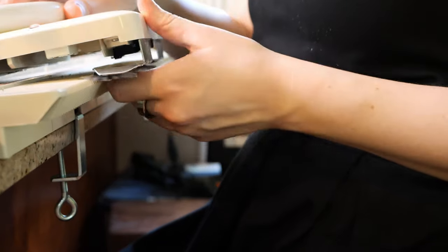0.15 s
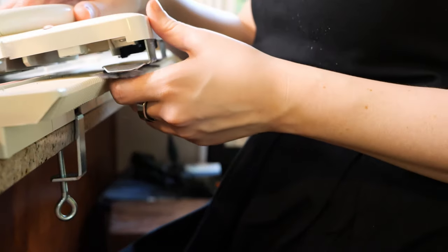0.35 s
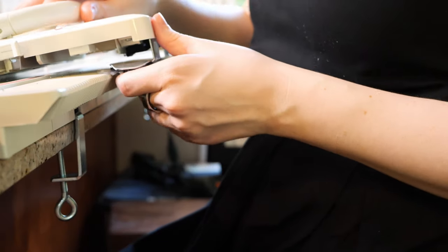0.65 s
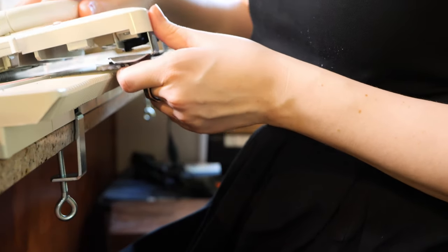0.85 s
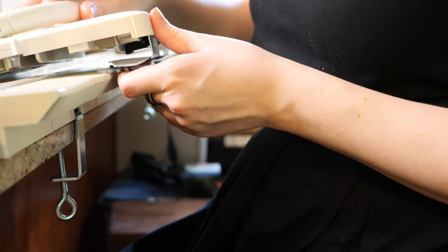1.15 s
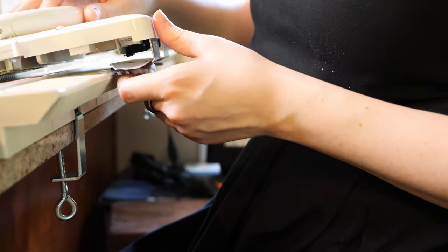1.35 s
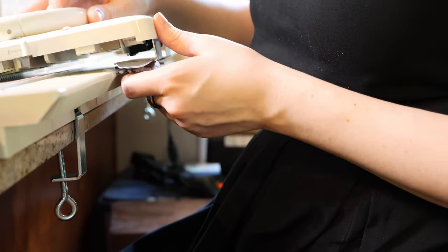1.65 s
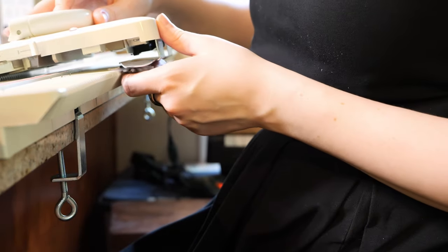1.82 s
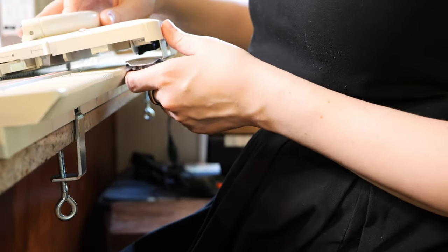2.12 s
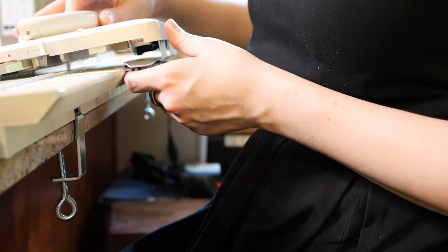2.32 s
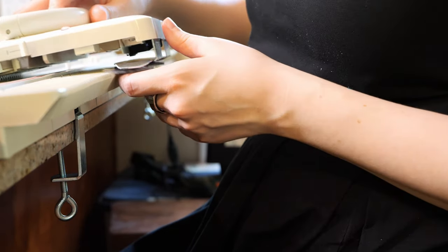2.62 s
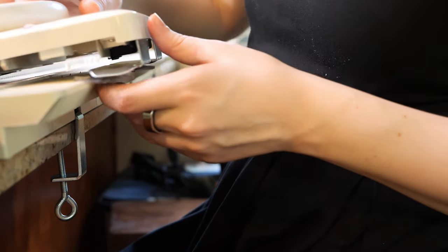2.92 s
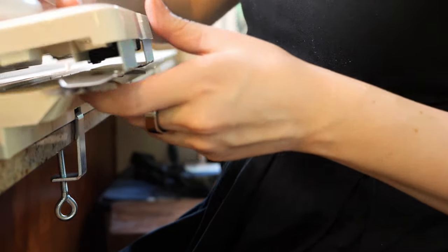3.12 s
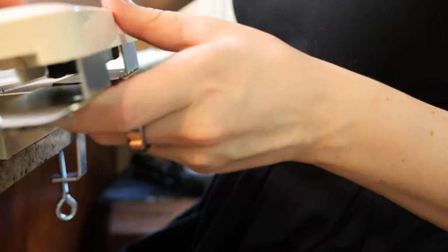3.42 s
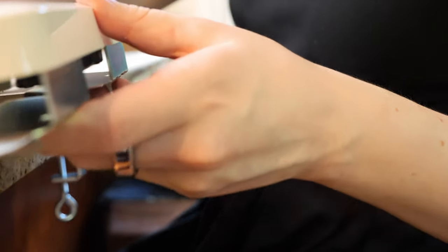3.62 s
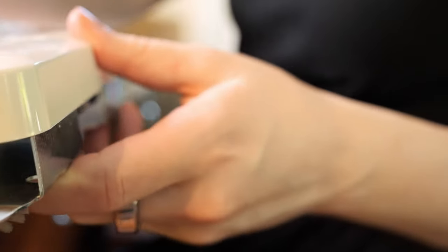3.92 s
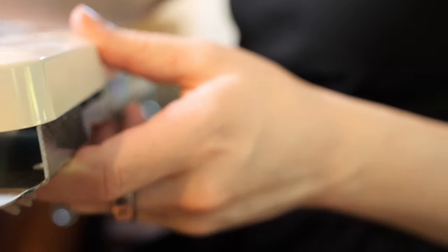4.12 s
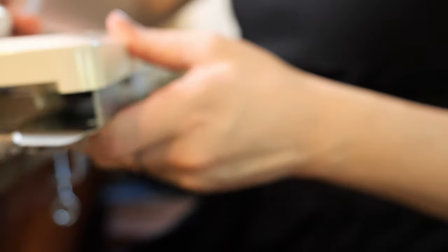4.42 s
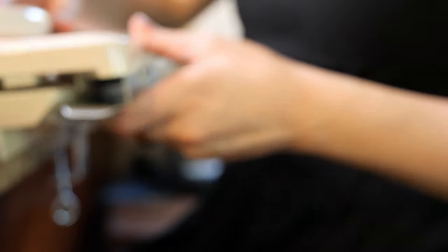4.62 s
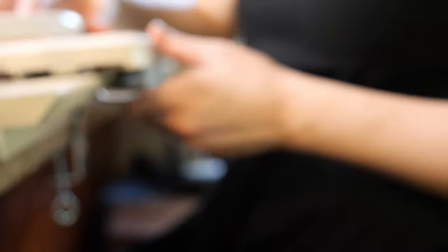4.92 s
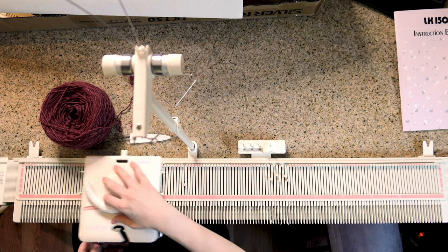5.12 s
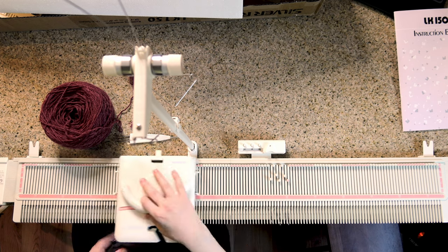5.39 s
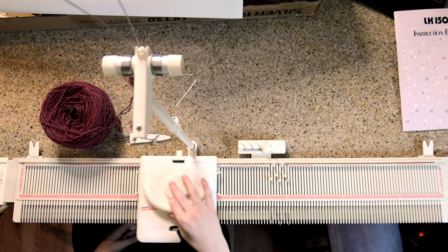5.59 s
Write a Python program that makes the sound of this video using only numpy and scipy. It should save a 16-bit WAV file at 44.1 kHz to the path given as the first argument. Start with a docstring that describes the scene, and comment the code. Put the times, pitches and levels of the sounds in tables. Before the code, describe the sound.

A knitting machine carriage, heard close up in a small room with quiet low room noise. At 0.14 s it knocks onto the bed with a sharp hollow plastic clack, then rasps slowly over needles until about 0.7 s with separate snaps. A near-quiet gap holds only faint taps, with small knocks at 1.3 and 1.46 s. A second short grating nudge runs 1.55-2.2 s. From 2.37 s a longer push begins, clicks crowding into a fast ratcheting scrape, brightest near 3.0 s and loudest around 3.2 s, easing by 3.7 s. At 3.9 s the carriage hits its stop with the loudest hollow clunk, rattling and ringing briefly. After a lull, small latch ticks gather from 4.28 to 4.6 s, with a firm knock at 4.81 s. Light gliding hiss and faint runner squeaks continue, then glassy clicks from 5.45 s and a double knock near 5.68 s.

```python
"""A knitting machine carriage, close by in a small room: seated on its needle bed, nudged twice, pushed along, slid back.
Needle butts snap through the cams and ring the plastic shell: short bursts of impacts through resonances.
The runners rasp on the rail and shake the table: dense random impacts, pulsing once per needle.
The carriage knocks against its stops with hollow rings, small steel latches tick, and runners sing in narrow bands.
Behind it lie quiet room noise and a short diffuse tail."""
import sys
import numpy as np
from scipy import signal
from scipy.fft import rfft, irfft, next_fast_len
from scipy.io import wavfile
from scipy.ndimage import uniform_filter1d

SR = 44100
rng = np.random.default_rng(int(sys.argv[2]) if len(sys.argv) > 2 else 0)


def dump(signal):
    """Clip the signal to [-1, 1] and save it as 16-bit WAV at the path in sys.argv[1]."""
    limited = np.clip(np.atleast_2d(signal).T, -1, 1)
    pcm = np.round(limited * 32767).astype(np.int16)
    wavfile.write(sys.argv[1], SR, pcm)


N = 253556
T = np.arange(N) / SR
HIT_T = T[:3072]  # time axis of one contact, s
LEAD = 176  # samples of scrape before each blow


def undb(db):
    """Decibels to gain."""
    return 10 ** (np.asarray(db) / 20)


def unit(x):
    """Scale to rms 1."""
    return x / np.sqrt(np.mean(x ** 2))


def crest(x):
    """Scale so that the loudest 3 ms have rms 1."""
    return x / np.sqrt(uniform_filter1d(x ** 2, size=132).max())


def through(x, response):
    """Pass a sound through an impulse response."""
    return signal.fftconvolve(x, response)[:len(x)]


def on_log(hz, points):
    """Read (f/Hz, value) points on a log-frequency axis."""
    f, value = np.transpose(points)
    return np.interp(np.log(np.maximum(hz, 1)), np.log(f), value)


def colour(points, size=4096):
    """Causal minimum-phase impulse response with the given spectrum, built from its folded cepstrum."""
    hz = np.arange(size // 2 + 1) * SR / size
    cepstrum = irfft(np.log(undb(on_log(hz, points))))
    cepstrum[1:size // 2] *= 2
    cepstrum[size // 2 + 1:] = 0
    return irfft(np.exp(rfft(cepstrum)))


def band(x, hz, width_hz):
    """One resonance, gain 1 at its centre."""
    b, a = signal.iirpeak(min(hz, SR / 2 - 1000), hz / width_hz, fs=SR)
    return signal.lfilter(b, a, x)


def fade(t, t60):
    """Exponential decay, 60 dB down at t60."""
    return np.exp(-np.log(1000) * t / t60)


def walk(rate):
    """Random drift of rms 1, taking a new value `rate` times a second."""
    hold = max(int(SR / rate), 2)
    steps = np.repeat(rng.standard_normal(N // hold + 1), hold)
    return unit(uniform_filter1d(steps, hold)[:N])


def read(curve):
    """A two-column curve over t/s at every sample, its end values held."""
    return np.interp(T, *np.transpose(curve))


def along(curve):
    """A (t/s, level/dB) curve at every sample, practically silent outside its span."""
    return np.interp(T, *np.transpose(curve), left=-200, right=-200)


def gains(curve):
    """The dB columns of a curve as gains, silent outside its span."""
    s, *columns = np.transpose(curve)
    inside = (T >= s[0]) * (T <= s[-1])
    return [undb(np.interp(T, s, column)) * inside for column in columns]


def add(out, s, sound):
    """Mix a sound in at time s."""
    i = max(int(s * SR), 0)
    out[i:i + len(sound)] += sound[:len(out[i:])]


def split(x, centres):
    """Overlapping bands that add up to x again."""
    size = next_fast_len(len(x), True)
    spectrum, hz = rfft(x, size), np.arange(size // 2 + 1) * SR / size
    shares = np.eye(len(centres))
    return [irfft(spectrum * on_log(hz, np.c_[centres, share]), size)[:len(x)] for share in shares]


def waver(x, lo_hz, hi_hz, depth_db, rate):
    """As the contact spot moves, each band of the response swells and thins on its own; rms 1."""
    parts = split(x, np.geomspace(lo_hz, hi_hz, num=7))
    return unit(sum(part * undb(depth_db * walk(rate)) for part in parts))


def grains(rate, spread_db, size):
    """Tiny impacts at random moments, a few much larger than the rest; rms 1."""
    hit = rng.random(size) < rate / SR
    sign = rng.choice([-1, 1], size)
    strength = undb(spread_db * np.minimum(rng.exponential(size=size), 3))
    return unit(hit * sign * strength + 1e-9)


def contact(length_s, rattle, rate, rise_s):
    """A short scrape leads up to one blow, then a rattle of smaller impacts dies away."""
    t = HIT_T - LEAD / SR
    rise = np.minimum(t, 0) / rise_s
    decay = (np.maximum(t, 0) / max(length_s, 1e-3)) ** 1.16
    force = grains(rate, 1.1, size=len(HIT_T)) * np.exp(rise - decay)
    force *= rattle / np.sqrt(np.sum(force ** 2))  # rattle: root energy beside a blow of 1
    force[LEAD] += 1
    return force


# room noise around the microphone: f/Hz, level/dB
AIR_COLOUR = [(12, -26), (20, -3.5), (60, -2), (86, -8), (150, -4.5), (172, -4.5), (222, -9), (1030, -21.5),
              (1220, -30), (1610, -25.5), (4300, -34), (13900, -34.5), (16000, -36)]
AIR_DB = -61.5


def air(trim_db=-0.5):
    """Quiet steady room noise: white noise through one colour."""
    return undb(AIR_DB + trim_db) * unit(through(rng.standard_normal(N), colour(AIR_COLOUR)))


# decay of the small room: f/Hz, t60/s
ROOM_DECAY = [(150, 0.83), (600, 0.32), (2000, 0.37), (6000, 0.38), (14000, 0.15)]


def room(x, wet_db, gap_s=0.0047):
    """The sound plus the diffuse tail of a small room, decaying at its own pace in each band."""
    t = T[:SR // 2]
    centres, t60s = np.transpose(ROOM_DECAY)
    parts = split(rng.standard_normal(len(t)), centres)
    tail = sum(part * fade(t, t60) for part, t60 in zip(parts, t60s))
    tail *= np.clip(t / gap_s - 1, 0, 1)  # silent for one gap, risen after two
    return x + undb(wet_db) * through(x, tail / np.sqrt(np.sum(tail ** 2)))


# runners singing on the rail: t/s, length/s, f/Hz, level/dB
RUNNER_SQUEAKS = [(3.855, .031, 6800, -55), (4.651, 0.21, 1830, -53.5), (4.685, 0.0093, 6650, -42),
                  (4.689, 0.17, 6720, -65), (5.254, 0.12, 1110, -54), (5.27, 0.1, 1910, -51.5),
                  (5.273, 0.09, 7040, -68), (5.559, 0.13, 760, -53)]


def squeaks(width_hz=260):
    """A runner sings briefly: noise through a narrow band, filtered twice."""
    out = np.zeros(N)
    for s, length_s, hz, db in RUNNER_SQUEAKS:
        swell = signal.windows.tukey(int(length_s * SR))
        tone = band(band(rng.standard_normal(len(swell)), hz, width_hz), hz, width_hz)
        add(out, s, undb(db) * swell * unit(tone))
    return out


# modes of the plastic shell and needle bed: f/Hz, t60/s, level over the broad response/dB
SHELL_MODES = [(585.5, 0.069, -0.5), (683, 0.077, -9.5), (795, 0.12, -5.5), (864.6, 0.045, -3),
               (980, 0.078, -8), (1093, 0.042, -7.5), (1220, 0.089, -10), (1500, 0.061, -35),
               (1600, 0.068, -19), (1768, 0.082, -5), (1900, 0.13, -6.5), (2190, 0.086, -9),
               (2670, 0.21, -14), (3550, 0.29, 4), (3610, 0.46, -9), (5350, .04, -22)]


def shell(points):
    """Response of the carriage: a broad colour with its modes ringing on top."""
    broad = colour(points)
    width_per_t60 = np.log(1000) / np.pi  # a mode's bandwidth is this over its t60
    return broad + sum(undb(db) * band(broad, hz, width_per_t60 / t60) for hz, t60, db in SHELL_MODES)


# shell colour under latches and light gliding: f/Hz, level/dB
LIGHT_SHELL_COLOUR = [(150, -32), (300, -9.5), (560, -5.5), (850, -8), (1100, -2), (1500, -1.5), (1900, -2),
                      (2350, -2.5), (3000, -10.5), (3600, -19.5), (4500, -15), (10000, -86)]
# bright steel colour of latches and gliding runners: f/Hz, level/dB
BRIGHT_STEEL_COLOUR = [(1500, -45), (2800, 9), (3800, -4), (5500, 3.5), (8000, 1), (10500, 0.5), (13000, 3),
                       (16000, -5.5)]
# latches flicking: t/s, level before trims/dB, shell relative level before trim/dB, steel ring f/Hz, shell ring f/Hz
LATCH_FLICKS = [(2.4895, -42.5, 0, 6100, 1640), (4.2817, -51.5, 0, 5870, 2230),
                (4.3193, -52.5, 6, 5970, 2300), (4.3747, -50, 4, 5090, 2260), (4.396, -47, -4, 6240, 2830),
                (4.44, -47.5, -2, 5910, 2350), (4.494, -41.5, -11, 6550, 2210),
                (4.512, -39, -4, 6480, 2900), (4.5307, -41.5, -5, 6180, 2890),
                (4.5458, -34.5, -10, 6140, 2800), (4.5762, -35, -11, 8040, 2820),
                (4.736, -49.5, 11, 6240, 1840), (4.7669, -52, 14.5, 6230, 1640),
                (5.073, -46.5, 0, 6740, 1860), (5.452, -41.5, 8.5, 7950, 1190),
                (5.469, -43, -3, 12350, 1790), (5.478, -39, 6, 12700, 1640),
                (5.497, -39.5, 6.5, 12020, 1680), (5.538, -36, -1.5, 15100, 2250),
                (5.569, -42, -3, 13540, 1790), (5.5982, -35.5, 2.5, 12300, 2300),
                (5.625, -48, 11.5, 7280, 1590), (5.705, -32.5, 1, 14100, 1900)]
LATCH_RATTLE_S = 0.0056


def latches(tick_db=0, body_db=-1, ring_db=2, ring_width_hz=1200):
    """A latch scrapes open in a few milliseconds: a bright zip with some of the shell under it."""
    out, body, steel = np.zeros(N), shell(LIGHT_SHELL_COLOUR), colour(BRIGHT_STEEL_COLOUR)
    for s, db, shell_db, steel_hz, shell_hz in LATCH_FLICKS:
        tick = through(contact(LATCH_RATTLE_S, 7.2, 7000, 0.00033), steel)
        tick = tick + undb(ring_db) * band(tick, steel_hz, ring_width_hz)
        clack = through(contact(LATCH_RATTLE_S, 3.4, 3000, 0.0016), body)
        clack = clack + 3.3 * band(clack, shell_hz, 290)
        flick = undb(tick_db) * crest(tick) + undb(body_db + shell_db) * crest(clack)
        add(out, s - LEAD / SR, undb(db) * flick)
    return out


# carriage gliding lightly into its stop, then back again, one list each:
# t/s, rasp level before trim/dB, hiss level/dB
GLIDE_STROKES = [
    [(3.79, -61.5, -67), (3.9, -58, -54.5)],
    [(4.1, -65, -71.5), (4.458, -54.5, -62.5), (4.678, -48.5, -57), (4.9, -54.5, -60), (5.15, -53, -60),
     (5.536, -47.5, -56), (5.656, -47, -58), (5.75, -48, -46.5)],
]


def glide(rasp_db=-.5, hiss_db=0.0, catch_db=2.0, hum_db=-17):
    """Clear of the needles the runners rub finely, their colour shifting along the rail."""
    rasp, hiss = np.sum([gains(stroke) for stroke in GLIDE_STROKES], axis=0)
    catch = undb(catch_db * walk(90))
    rub = through(catch * grains(3000, 1.8, size=N), shell(LIGHT_SHELL_COLOUR))
    scrape = waver(rub, 770, 3700, 0.69, 13)
    steel_rub = through(catch * grains(14000, 2.0, size=N), colour(BRIGHT_STEEL_COLOUR))
    sizzle = waver(steel_rub, 3600, 18400, 2.2, 12)
    table = unit(band(band(rng.standard_normal(N), 113, 210), 140, 330))
    return rasp * (undb(rasp_db) * scrape + undb(hum_db) * table) + undb(hiss_db) * hiss * sizzle


# shell colour under a knock: f/Hz, level/dB
KNOCK_SHELL_COLOUR = [(88, -52), (170, -18), (340, -19), (450, -5.5), (600, -2.5), (800, -8), (1250, -5),
                      (1850, -3.5), (2300, -7), (2800, -11.5), (3300, -17), (4500, -36), (6000, -61),
                      (10000, -80)]
# steel edge and needle ticks: f/Hz, level/dB
STEEL_TICK_COLOUR = [(2000, -35), (4000, -2), (5300, -1), (7200, -1.5), (8500, -1.5), (10300, -3.5),
                     (13000, -1), (16000, -5)]
# carriage knocking on the bed: t/s, level before trims/dB, low ring f/Hz, high ring f/Hz,
# high ring relative level/dB, steel tick relative level before trim/dB, rattle length/s (shorter for the tick)
BED_KNOCKS = [(.1353, -22, 850, 1190, -6, -17.5, 0.0037), (0.1385, -29.5, 820, 1200, 11, -7, .0028),
              (0.778, -51.5, 860, 1110, 11, -18, 0.0069), (0.868, -49.5, 980, 1450, 3, -16, 0.0089),
              (0.877, -51, 990, 1930, 5, -24, .006), (1.031, -58, 1040, 1300, 6, -22, .004),
              (1.115, -56.5, 970, 1540, 9, -14, .005), (1.2975, -41.5, 850, 1770, -17, -15, 0.0073),
              (1.3034, -48, 940, 1550, -17, -30, 0.016), (1.46, -43, 850, 1180, -16, -18, 0.0072),
              (3.9018, -12, 635, 1315, 5, -15.5, 0.0092), (3.911, -18.5, 684, 1870, -2, -15, 0.0046),
              (3.92, -22, 865, 1280, -6, -5.5, 0.0074), (4.2952, -45, 850, 1730, -16, -13, .0055),
              (4.3376, -43.5, 604, 2200, -6, -13.5, .006), (4.569, -34.5, 660, 1490, 23, -22, .004),
              (4.8119, -26.5, 584, 1270, 2.5, -21, 0.0068), (4.8172, -34, 810, 1930, 7, -3, .0034),
              (5.1768, -37.5, 1050, 2170, 2, -26, .009), (5.677, -24.5, 686, 1190, 9, -3, 0.018),
              (5.6831, -24.5, 750, 1890, 6, -14, .008)]


def knocks(body_db=-1.0, tick_db=-4.0, broad_db=-7, low_width_hz=190, high_width_hz=340, rattle=10.0,
           edge_hz=5400, edge_db=2):
    """The whole carriage hits the bed: two hollow rings over the clack of the shell, and a metal edge."""
    out, body, steel = np.zeros(N), shell(KNOCK_SHELL_COLOUR), colour(STEEL_TICK_COLOUR)
    blow = np.pad(body, (LEAD, 0))[:len(HIT_T)]
    for s, db, low_hz, high_hz, high_db, bright_db, length_s in BED_KNOCKS:
        low = band(band(blow, low_hz, low_width_hz), low_hz, 3 * low_width_hz)
        high = band(band(blow, high_hz, high_width_hz), high_hz, 3 * high_width_hz)
        rings = crest(low) - undb(high_db) * crest(high)
        rattling = through(contact(length_s, rattle, 3000, 0.0015), body)
        clack = crest(rings) + undb(broad_db) * crest(rattling)
        tick = through(contact(0.63 * length_s, 1.2, 7000, 0.0011), steel)
        tick = tick + undb(edge_db) * band(tick, edge_hz, 250)
        knock = undb(body_db) * crest(clack) + undb(tick_db + bright_db) * crest(tick)
        add(out, s - LEAD / SR, undb(db) * knock)
    return out


def knock_tail(t60_s=0.53):
    """Each knock leaves a dying tail: the room's echo in the shell range, table shake in the lows; powers add."""
    tails = [undb(db) * (T > s) * fade(np.abs(T - s), t60_s) for s, db, *_ in BED_KNOCKS]
    return np.sqrt(sum(tail ** 2 for tail in tails))


# brightness of the shell as the carriage moves past the microphone: t/s, level of its upper range/dB
SHELL_BRIGHTNESS = [(0, -2.5), (.6, 1.5), (1.7, 0.5), (2.1, -0.5), (2.55, -1), (3.0, 5), (3.22, -3.5),
                    (3.38, -2), (3.7, -2.5)]
HISS_PER_BRIGHTNESS = 0.87  # dB of hiss or steel tick per dB of brightness


def brightness(x, hz=2500, width_hz=1300):
    """The upper range of the shell brightens and dulls as the carriage moves past the microphone."""
    return x + (undb(read(SHELL_BRIGHTNESS)) - 1) * band(x, hz, width_hz)


def sheen(x, start_s=5.4, hz=14800, width_hz=3000, db=3.5):
    """The very top turns glassier over 0.14 s, near the end, and stays so."""
    return x + undb(db) * np.clip((T - start_s) / 0.14, 0, 1) * band(x, hz, width_hz)


# carriage travel, one list for each of three strokes: t/s, needles passed
NEEDLE_TRAVEL = [
    [(.003, 0), (.183, 4), (.273, 6), (.429, 10), (.497, 12), (.613, 15), (.668, 16)],
    [(1.574, 0), (1.66, 2), (1.769, 4), (1.861, 6), (1.9435, 8), (2.055, 11), (2.16, 13)],
    [(2.37, 0), (2.482, 2), (2.563, 4), (2.719, 9), (2.847, 15), (3.098, 29), (3.214, 36), (3.402, 46),
     (3.557, 53), (3.68, 58)],
]


def needle_phase():
    """Needles passed so far, stroke after stroke; it stands still between strokes."""
    return sum(read(travel) for travel in NEEDLE_TRAVEL)


# effort of the hand, one list per stroke, as the rasp before trim: t/s, level/dB
HAND_EFFORT = [
    [(0, -48), (.07, -54.5), (.21, -47), (.33, -40), (.55, -39), (.62, -43), (.73, -59.5), (.82, -77),
     (.9, -68), (1.05, -80)],
    [(1.54, -66), (1.59, -60), (1.68, -49.5), (1.77, -44), (2.01, -35.5), (2.16, -46.5), (2.22, -58),
     (2.31, -67)],
    [(2.31, -67), (2.39, -50), (2.49, -46), (2.55, -39.5), (2.66, -35), (2.82, -29), (3.06, -28.5),
     (3.17, -21.5), (3.28, -26.5), (3.35, -37), (3.45, -34), (3.61, -33.5), (3.7, -44), (3.82, -62)],
]
# shell colour under the needles and the push: f/Hz, level/dB
SHELL_BROAD_COLOUR = [(100, -28), (200, -22), (360, -15), (460, -5), (600, -2.5), (820, 0), (1300, -2.5),
                      (1850, -1.5), (2300, -3.5), (2700, -5.5), (3200, -14), (4200, -22.5), (6000, -21.5),
                      (10000, -72)]
# table top under the bed: f/Hz, nominal width/Hz (widened in use), level/dB
TABLE_MODES = [(38.6, 7.3, -10), (58, 6.2, 3), (88, 27, -4), (120.4, 25.3, -2), (158.5, 62, -3),
               (253, 78, -7.5)]
# effort of a firm push, and the hiss and table rumble at that effort (dB)
FIRM_DB, HISS_DB, RUMBLE_DB = -29.5, -43.5, -43.5
HISS_PER_EFFORT, RUMBLE_PER_EFFORT = 0.8, .62  # dB per dB of effort
ECHO_DB, TABLE_TAIL_DB = -25, -33  # knock tail in shell range (before rasp trim) and lows, relative to the blow
RASP_DB = -2  # trim of everything in the shell range
PULSE_DB, PULSE_SHARE = 1.5, 0.24  # once-per-needle swing, and its peak as a share of the spacing
JUDDER_DB = -28.5  # needle rate and its double, each relative to the random shake


def push(catch_db=0.64):
    """Runners and needles catch and slip: dense impacts ring the shell, sizzle on steel, shake the table."""
    effort_db = np.max([along(stroke) for stroke in HAND_EFFORT], axis=0)
    over_firm_db = effort_db - FIRM_DB
    tail = knock_tail()
    phase = needle_phase()
    moving = np.gradient(phase) > 0
    pulse = undb(PULSE_DB * moving * np.cos(2 * np.pi * (phase - PULSE_SHARE)))

    rasp = pulse * undb(effort_db) + undb(ECHO_DB) * tail
    hiss_db = HISS_DB + HISS_PER_EFFORT * over_firm_db + HISS_PER_BRIGHTNESS * read(SHELL_BRIGHTNESS)
    hiss = pulse * undb(hiss_db)
    rumble = undb(RUMBLE_DB + RUMBLE_PER_EFFORT * over_firm_db) + undb(TABLE_TAIL_DB) * tail

    catch = undb(catch_db * walk(170))
    slips = through(catch * grains(1800, 2.1, size=N), shell(SHELL_BROAD_COLOUR))
    scrape = waver(slips, 550, 3000, 2, 20)
    flicker = undb(3.5 * walk(300))
    steel_slips = through(catch * flicker * grains(9000, 3.2, size=N), colour(STEEL_TICK_COLOUR))
    sizzle = waver(steel_slips, 3700, 16600, 2.0, 18)
    judder = np.sin(2 * np.pi * phase) + np.sin(4 * np.pi * phase)
    shake = grains(900, 2.4, size=N) + undb(JUDDER_DB) * judder
    modes = [undb(db) * band(band(shake, hz, 1.9 * width), hz, 4 * width) for hz, width, db in TABLE_MODES]
    table = unit(sum(modes))
    return undb(RASP_DB) * rasp * scrape + hiss * sizzle + rumble * table


# an ordinary needle: its snap and its drop over the effort, and the drop's delay as a share of the spacing
SNAP_DB, DROP_DB, DROP_SHARE, SNAP_SCATTER_DB = 5.5, 5, .24, 0.9
BLUR_DB_PER_OCTAVE, SLOW_NEEDLES_PER_S = 4, 20.1  # the faster the carriage, the less the snaps stand out
SNAP_RING_HZ, DROP_RING_HZ, RING_SCATTER_OCTAVES = 810, 1460, 0.31  # centres of the scatter
TICK_DB, TICK_SCATTER_DB = -18, 3  # steel tick relative to the snap, before brightness


def passing():
    """Each needle snaps at the cam, then drops off: rows of t/s, level/dB, tick relative level/dB, ring f/Hz."""
    rows = []
    for travel, effort in zip(NEEDLE_TRAVEL, HAND_EFFORT):
        times, passed = np.transpose(travel)
        needle = np.arange(round(passed[-1]) + 1)
        snap_s = np.interp(needle, passed, times)
        spacing_s = np.maximum(np.gradient(snap_s), 1e-3)
        drop_s = snap_s + DROP_SHARE * spacing_s
        blur_db = BLUR_DB_PER_OCTAVE * np.log2(spacing_s * SLOW_NEEDLES_PER_S)
        for s, db, hz in ((snap_s, SNAP_DB, SNAP_RING_HZ), (drop_s, DROP_DB, DROP_RING_HZ)):
            strength, edge, spot = rng.standard_normal((len(s), 3)).T
            level = np.interp(s, *np.transpose(effort)) + db + blur_db + SNAP_SCATTER_DB * strength
            brightness_db = np.interp(s, *np.transpose(SHELL_BRIGHTNESS))
            tick_db = TICK_DB + HISS_PER_BRIGHTNESS * brightness_db + TICK_SCATTER_DB * edge
            rows += zip(s, level, tick_db, hz * 2 ** (RING_SCATTER_OCTAVES * spot))
    return rows


# needle butts that jam and snap hard: t/s, level before trims/dB, steel tick relative level/dB, favoured ring f/Hz
JAMMED_SNAPS = [(.183, -36, -17, 2060), (0.3013, -29, -33, 1790), (.4967, -31, -28, 1830),
                (0.5349, -31, -22, 1870), (.5414, -33.5, -12, 1200), (.5837, -32, -16, 1180),
                (1.5737, -43, -12, 724), (1.585, -42, -15, 1150), (1.8607, -32, -21, 700),
                (1.9102, -32.5, -18, 740), (1.953, -27, -12.5, 1700), (2.0188, -29, -21, 850),
                (2.159, -37.5, -21, 1700), (2.3697, -41, -12, 950), (2.5245, -33.5, -14, 1770),
                (2.5348, -30.5, -15, 1771), (2.6304, -29.5, -18, 1700), (2.6611, -28, -16, 830),
                (2.6915, -25, -24, 1590), (2.719, -23.5, -12, 1810), (2.7435, -22, -12, 1590),
                (2.8468, -22.5, -9.5, 1030), (2.902, -23.5, -6, 2520), (2.9173, -24, -5, 2290),
                (3.133, -16, -13, 1560), (3.163, -14.5, -20, 869), (3.1807, -13.5, -29, 1820),
                (3.199, -14, -13, 1150), (3.215, -13.5, -27, 969.6), (3.2555, -15.5, -29, 1130),
                (3.2918, -17.5, -16.5, 1330), (3.3446, -24.5, -26, 705), (3.5152, -22, -17, 780),
                (3.557, -20.5, -20, 1155), (3.582, -20, -14, 1220), (3.6053, -22.5, -20, 1240),
                (3.6295, -23.5, -30, 1230)]
JAM_S = .008  # a hard snap takes the place of the ordinary ones this close to it
SNAP_RATTLE_S = 0.0071


def needles(body_db=-0.25, tick_db=0, rattle=2.32, spot_db=1, spot_width_hz=450):
    """Each butt rides up the cam and snaps over; the spot it strikes favours one pitch of the shell."""
    out, body, steel = np.zeros(N), shell(SHELL_BROAD_COLOUR), colour(STEEL_TICK_COLOUR)
    ordinary = [row for row in passing() if all(abs(row[0] - hard[0]) > JAM_S for hard in JAMMED_SNAPS)]
    for s, db, bright_db, hz in JAMMED_SNAPS + ordinary:
        clack = through(contact(SNAP_RATTLE_S, rattle, 3000, 0.00092), body)
        clack = clack + undb(spot_db) * band(clack, hz, spot_width_hz)
        tick = through(contact(SNAP_RATTLE_S, 1.6, 7000, 0.00073), steel)
        tick = tick + 1.2 * band(tick, rng.uniform(6700, 7300), 1300)
        snap = undb(body_db) * crest(clack) + undb(tick_db + bright_db) * crest(tick)
        add(out, s - LEAD / SR, undb(db) * snap)
    return out


def scene():
    """All parts of the machine in the room, the knocks with a little more tail, over the room noise."""
    carriage = brightness(needles() + push())
    sliding = room(carriage + glide() + latches() + squeaks(), wet_db=-15.0)
    knocking = room(knocks(), wet_db=-13.0)
    return (sheen(sliding + knocking) + air())[None]


def record(dry):
    """The recorder cuts the top steeply above 16 kHz."""
    return signal.sosfilt(signal.ellip(12, .2, 70, 16000, fs=SR, output="sos"), dry)


dry = scene()
out = record(dry)
dump(out)
```